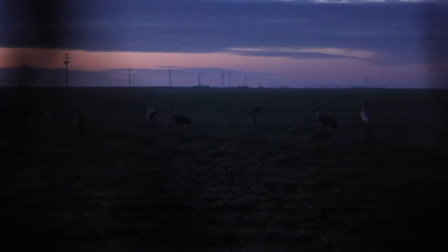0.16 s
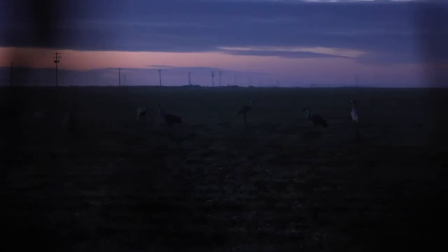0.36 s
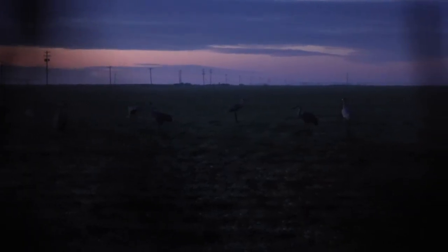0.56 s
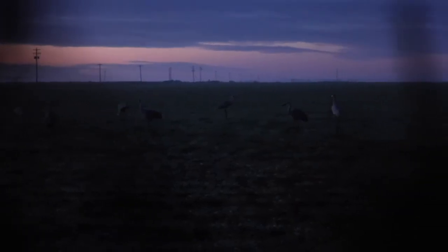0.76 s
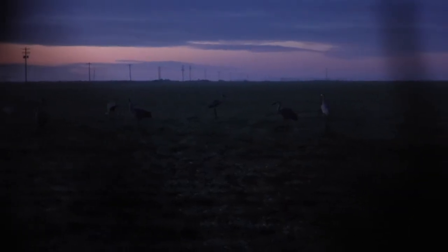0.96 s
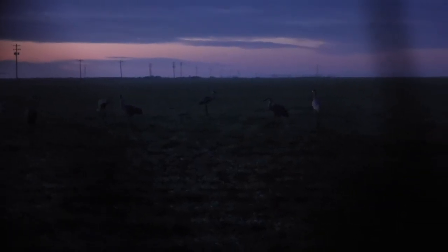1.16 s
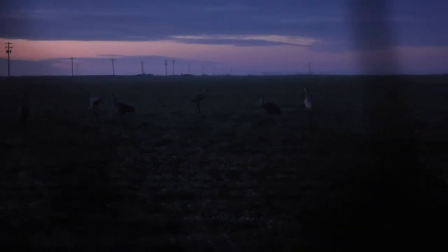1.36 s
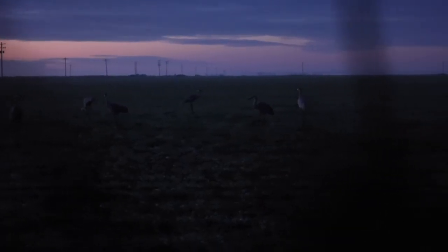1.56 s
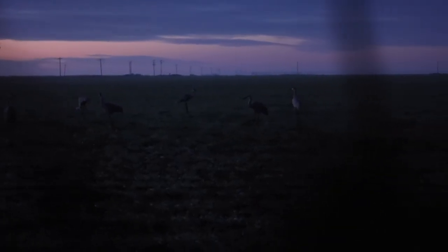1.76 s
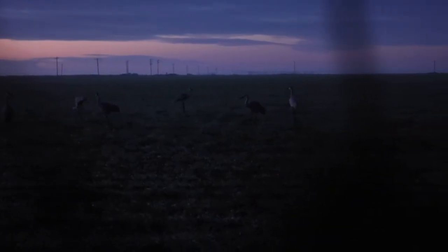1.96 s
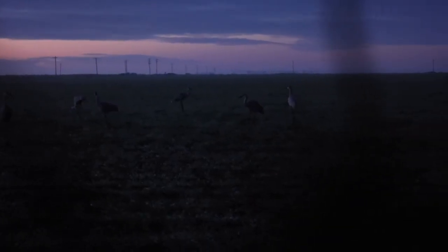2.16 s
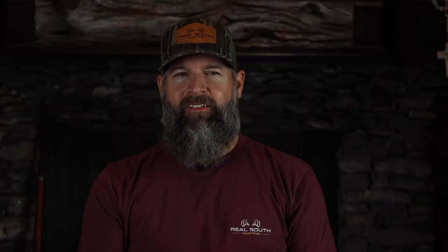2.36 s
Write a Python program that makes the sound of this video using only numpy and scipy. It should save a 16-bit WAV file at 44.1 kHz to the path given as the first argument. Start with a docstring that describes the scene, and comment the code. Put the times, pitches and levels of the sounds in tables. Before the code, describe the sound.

Nearby cranes call in quick runs of reedy pulses over a faint hiss.

```python
"""An open field at dawn, with sandhill cranes calling close by.
Each rattling call is a run of short reedy pulses: membranes in the bird's throat vibrate, fall in
pitch and turn rough, and the long windpipe rings with them. Soft low notes, a few ticks, dull
rustles and thin whistles lie between the calls, over a faint hiss and a low rumble."""
import sys
import numpy as np
from scipy import signal
from scipy.fft import rfft, irfft
from scipy.io import wavfile
from scipy.ndimage import uniform_filter1d

SR = 44100
rng = np.random.default_rng(int(sys.argv[2]) if len(sys.argv) > 2 else 0)


def dump_mix(stems):
    """Bounce the given channels to the path in sys.argv[1] as a 16-bit WAV at rate SR."""
    frames = np.atleast_2d(stems).T  # one column per channel
    limited = np.clip(frames, -1, 1)  # hard clip at full scale
    pcm = np.round(limited * 32767).astype(np.int16)
    wavfile.write(sys.argv[1], SR, pcm)


N = 105707


def from_db(db):
    """Turn decibels into a number to multiply by."""
    return 10 ** (np.asarray(db) / 20)


def rms_one(x):
    """Scale a sound so that its average strength (rms) is 1."""
    return x / np.sqrt(np.mean(x ** 2) + 1e-20)


def add(out, time, x):
    """Mix a sound in at a time in seconds."""
    i = int(round(time * SR))
    x = x[max(-i, 0):max(len(out) - i, 0)]
    out[max(i, 0):max(i, 0) + len(x)] += x


def resonance(x, hz, width_hz):
    """Let a sound ring at one pitch; a narrower width rings longer."""
    r = np.exp(-np.pi * width_hz / SR)
    feedback = [1, -2 * r * np.cos(2 * np.pi * hz / SR), r * r]
    return signal.lfilter(np.array([1, 0, -1]) * (1 - r * r) / 2, feedback, x + 1e-18)


def low_pass(x, hz):
    """Soften everything above hz."""
    return signal.sosfilt(signal.butter(2, hz, fs=SR, output="sos"), x)


def high_pass(x, hz):
    """Soften everything below hz."""
    return signal.sosfilt(signal.butter(2, hz, "high", fs=SR, output="sos"), x)


def coloured_noise(points):
    """Noise whose mix of low and high follows (frequency [Hz], level [dB]) points."""
    hz, db = np.transpose(points)
    freqs = np.maximum(np.arange(N // 2 + 1) * SR / N, 1)
    gains = from_db(np.interp(np.log(freqs), np.log(hz), db))
    return rms_one(irfft(rfft(rng.standard_normal(N)) * gains, N))


def swell(length):
    """A smooth rise and fall."""
    return np.sin(np.pi * np.arange(int(length * SR)) / (length * SR)) ** 2


def narrow_swell(time, length, db, hz, width_hz):
    """A narrow band of noise that rises and fades."""
    out, shape = np.zeros(N), swell(length)
    band = resonance(rng.standard_normal(N), hz, width_hz)
    band = rms_one(resonance(band, hz, width_hz))
    add(out, time, from_db(db) * shape * band[-len(shape):])
    return out


# The pulses of the calls: (time [s], length [s], level [dB], start pitch [Hz], middle pitch [Hz],
# end pitch [Hz], roughness [0 smooth, 1 or more fully rough], lowest tone boost [dB],
# upper overtone boost [dB], singing overtone [Hz], its boost [dB], treble boost [dB], fade [dB])
CRANE_PULSES = [ (-.010, 0.0092, -24, 965, 812, 756, 0.74, 3.5, 9, 2474, 7, -3, 2),
                (0.0374, 0.019, -23, 1128, 952, 798, 0.71, 0, -1, 2880, 8.5, 8, 4.5),
                (0.0901, 0.014, -24.5, 1216, 973.4, 776, 0.71, 4.5, 8, 2050, 10, 4, 0.5),
                (0.7854, 0.016, -25.5, 820, 791.6, 727, 0.08, -6, -7, 3440, 17.5, 2.5, 2.5),
                (0.8217, 0.027, -26.5, 900, 846.5, 753, 0.26, -3.5, -3.5, 3370, 13.5, 4.5, 3.5),
                (0.8763, 0.023, -27.5, 865.5, 851, 734.5, 0.51, -5.5, -2, 4330, 9.5, -2, 0.5),
                (1.083, 0.01, -23.5, 900, 826, 760, 0.77, 2.5, 3.5, 2220, 3, -1, 4.5),
                (1.6519, 0.013, -26, 791, 758, 708, 0.25, -5.5, -7.5, 3670, 15.5, -6, 3.5),
                (1.6907, 0.021, -28, 787, 734, 707, .45, -8, -6.5, 3770, 18, -9, 4.5),
                (1.8916, 0.011, -24, 838, 821, 722, 0.64, 4.5, 2, 2410, -1, -6, 6.5),
                (2.0046, 0.021, -26, 1180, 831, 715.4, 0.52, 5.5, 0, 3720, 8.5, 1.5, 6.5),
                (2.0469, 0.014, -27.5, 1040, 825.5, 789, 0.76, 6.5, 2.5, 2450, 2, -1.5, 1.5),
                (2.0912, .017, -24, 970, 868, 762, 0.48, 4.5, 1, 3600, 5, 0, 6.5),
                (2.1361, 0.0092, -33.5, 682, 640, 691, 1.12, -6.5, -2.5, 2180, 0, -6, -1.5),
                (2.1699, 0.01526, -23, 1050, 811.3, 797, 0.73, 5.5, 3, 2390, 3.5, -3.5, 7),
                (2.2178, 0.017, -24.5, 1183, 871, 755, 0.77, 4, 1.5, 2640, 5, 0, 5),
                (2.2658, 0.019, -26, 1326, 900, 805, 0.65, 4, -1, 2870, 8.5, 5.5, 2.5),
                (2.3122, 0.017, -26.5, 1185, 877, 808, 0.83, 4.5, 0, 2950, 8, 5, 2.5),
                (2.3613, 0.02, -26.5, 1115, 925, 732, 0.62, 8.5, 1.5, 2980, 10.5, 6, 5.5)]


def crane_calls():
    """Short pulses in quick runs make the cranes' rattle."""
    out = np.zeros(N)
    for time, *shape in CRANE_PULSES:
        add(out, time, pulse(rng.standard_normal((4, SR // 2)), *shape))
    return out


ATTACK_S, SWELL_S, RELEASE_S, TAIL_S = 0.0022, 0.0032, 0.0025, 0.031
ROUGH_AT_START = 0.15   # share of the roughness present as a pulse begins
HOLD_DB, EVEN_S = -7.5, 0.002   # the voice is evened out within this range of its top, over this time
CHOKE_DB, CHOKE_S = 5.5, 0.0013   # rough pulses choke the ring of the windpipe as they end
PUFF_DB, PUFF_HZ = -22.5, 159   # push of air with each rough pulse
THROAT_DB, THROAT_HZ, THROAT_WIDTH_HZ = -27, 605, 294   # hollow rush under every pulse


def pulse(noise, length, level_db, start_hz, middle_hz, end_hz, rough,
          fundamental_db, overtone_db, singing_hz, singing_db, treble_db, fade_db):
    """One reedy burst: it swells, drops in pitch, roughens and fades, and the windpipe rings on."""
    t = np.arange(int((length + TAIL_S) * SR)) / SR
    *wobble, air = noise[:, :len(t)]
    progress, after_end = np.minimum(t / length, 1), np.maximum(t - length, 0)
    rough = np.clip(rough, 0, 1)
    roughness = rough * (ROUGH_AT_START + (1 - ROUGH_AT_START) * np.minimum(4.8 * progress, 1) ** 2)
    effort = np.minimum(t / ATTACK_S, 1) * np.exp(-after_end / RELEASE_S)
    buzz = membranes(t, wobble, length, start_hz, middle_hz, end_hz, roughness,
                     fundamental_db, overtone_db)
    voice = windpipe(effort * buzz, singing_hz, singing_db, treble_db)
    strength = np.sqrt(np.abs(uniform_filter1d(voice ** 2, int(EVEN_S * SR))))
    voice = voice / np.maximum(strength, strength.max() * from_db(HOLD_DB))
    choke_db = CHOKE_DB * rough * np.minimum(after_end / CHOKE_S, 1)
    envelope = np.minimum(t / SWELL_S, 1) * from_db(-fade_db * progress ** 2 - choke_db)
    puff = from_db(PUFF_DB) * rough ** 3 * effort * rms_one(low_pass(air, PUFF_HZ))
    rush = resonance(effort * air, THROAT_HZ, THROAT_WIDTH_HZ) / np.sqrt(np.pi * THROAT_WIDTH_HZ / SR)
    return from_db(level_db) * (envelope * voice + puff + from_db(THROAT_DB) * rush)


OVERTONE_DB_PER_OCTAVE, BLOOM_S = -1.5, 0.0065   # overtones build up after the lowest tone
PITCH_WOBBLE, LEVEL_WOBBLE, WOBBLE_HZ = 0.073, 0.5, 900   # at full roughness
RASP_DB, RASP_FROM_HZ = -7, 1100


def membranes(t, noise, length, start_hz, middle_hz, end_hz, roughness, fundamental_db, overtone_db):
    """Vibrating membranes make a sliding buzz that wobbles and rasps when rough."""
    jitter, shimmer, rasp = noise
    middle_share = np.clip((middle_hz - end_hz) / (start_hz - end_hz + 1e-6), .08, .8)
    bend = np.log(middle_share) / np.log(.5)   # curves the slide towards the middle pitch
    hz = end_hz + (start_hz - end_hz) * np.maximum(1 - t / length, 0) ** bend
    hz = hz * (1 + PITCH_WOBBLE * roughness * rms_one(low_pass(jitter, WOBBLE_HZ)))
    phase = 2 * np.pi * np.cumsum(hz) / SR
    k = np.arange(1, 22)[:, None]   # 1 is the lowest tone (the fundamental), the rest are overtones
    bloom = np.minimum(t / BLOOM_S, 1)
    levels_db = OVERTONE_DB_PER_OCTAVE * np.log2(k) + fundamental_db * (k == 1) + overtone_db * (k > 2)
    gains = from_db(levels_db) * bloom ** np.log(k)
    tone = (gains * (k * hz < SR / 2) * np.cos(k * phase)).sum(axis=0)
    tone = tone * (1 + LEVEL_WOBBLE * roughness * rms_one(low_pass(shimmer, WOBBLE_HZ)))
    return tone + from_db(RASP_DB + overtone_db) * roughness * bloom * high_pass(rasp, RASP_FROM_HZ)


TREBLE_FROM_HZ, TREBLE_TO_HZ = 5400, 15800
# The pitches at which the windpipe rings: (pitch [Hz], width [Hz], level [dB])
WINDPIPE_RINGS = [(660, 23, -2.5), (816, 70.5, -6), (1050, 375, -11.5), (1539.6, 98, 6), (1732, 137, 4.5),
                  (2109, 177, 1.5), (2423, 96, 2), (2885, 206, -2.5), (3534, 90, 1.5), (3996, 69, -2),
                  (4335, 132, 1.5), (4725, 465, -5), (6000, 970, -13.5), (7400, 1230, -19.5),
                  (8980, 540, -16.5), (11460, 4500, -31)]


def windpipe(x, singing_hz, singing_db, treble_db):
    """The long windpipe rings at its own pitches, and at one that the bird tunes for each pulse."""
    x = sum((-1) ** i * from_db(db) * resonance(x, hz, width)
            for i, (hz, width, db) in enumerate(WINDPIPE_RINGS))
    x = x + (from_db(singing_db) - 1) * resonance(x, singing_hz, width_hz=280)
    bass = low_pass(low_pass(x, TREBLE_FROM_HZ), TREBLE_FROM_HZ)
    treble = high_pass(high_pass(x, TREBLE_FROM_HZ), TREBLE_FROM_HZ)
    return low_pass(bass + from_db(treble_db) * treble, TREBLE_TO_HZ)


# Soft notes around the rattles: (time [s], length [s], level [dB], pitch [Hz])
LOW_NOTES = [(0.906, 0.068, -56.5, 647), (1.08, 0.0079, -37, 660), (1.107, 0.031, -53.5, 575),
             (1.568, 0.027, -48.5, 628), (1.8827, .015, -33, 594), (2.1325, 0.017, -34, 607)]


def low_notes(overtone_db=-21):
    """Nearly pure notes, each with one faint overtone an octave up."""
    out = np.zeros(N)
    for time, length, db, hz in LOW_NOTES:
        shape = swell(length)
        phase = 2 * np.pi * hz * np.arange(len(shape)) / SR
        tone = np.sin(phase) + from_db(overtone_db) * np.sin(2 * phase)
        add(out, time, from_db(db) * np.sqrt(2) * shape * tone)
    return out


# Dry ticks: (time [s], level before the low cut [dB], fade time [s])
TICKS = [(0.546, -46.5, 0.0076), (1.0094, -26.5, 0.0041)]
# The tone of a tick before the low cut: (frequency [Hz], level [dB])
TICK_COLOUR = [(88, -54), (150, -20), (350, 2.5), (1640, -28), (2230, -4.5), (3540, -2), (5300, -10),
               (6810, -24), (10200, -34), (15000, -50)]


def ticks(low_cut_hz=1190):
    """Short dry snaps: noise that starts at once and dies away fast."""
    out, t = np.zeros(N), np.arange(SR // 20) / SR
    for time, db, decay in TICKS:
        add(out, time, from_db(db) * np.exp(-t / decay) * coloured_noise(TICK_COLOUR)[:len(t)])
    return high_pass(out, low_cut_hz)


# Dull rustles: (time [s], length [s], level [dB], centre pitch [Hz])
RUSTLES = [(0.705, 0.054, -60, 312), (1.003, 0.02, -55, 310), (1.189, .14, -62, 222),
           (1.561, 0.049, -54, 343)]


def rustles():
    """Brief swells of low noise sound like dull rustling."""
    return sum(narrow_swell(*row, width_hz=240) for row in RUSTLES)


# Thin whistles and peeps: (time [s], length [s], level [dB], pitch [Hz])
WHISTLES = [(0.429, 0.13, -67, 1020), (.90, .17, -68, 3030), (1.019, 0.23, -64.5, 3060),
            (1.129, 0.2, -57, 3100), (1.176, .11, -61.5, 1566), (1.337, 0.042, -72, 6550),
            (1.383, 0.0385, -75.5, 6500), (1.425, 0.036, -78, 6500)]


def whistles():
    """Faint swells of high noise, narrow enough to have a pitch."""
    return sum(narrow_swell(*row, width_hz=190) for row in WHISTLES)


# How loud the hiss is as time passes: (time [s], level [dB])
HISS_LEVEL = [(0, -65.5), (0.118, -56), (0.153, -74.5), (.29, -64.5), (.5, -59.5), (.68, -62), (.77, -62.5),
              (0.969, -66.5), (1.052, -53.5), (1.13, -68), (1.24, -61.5), (1.38, -67.5), (1.52, -68.5),
              (1.588, -60.5), (1.74, -70.5), (1.872, -55.5), (1.931, -70), (1.975, -67.5), (2.03, -65),
              (2.4, -58)]
# The tone of the hiss and of the rumble: (frequency [Hz], level [dB])
HISS_COLOUR = [(59, -32), (100, -18.5), (129, -14.5), (255, -3.5), (295, -5.5), (389, -10), (648, -4),
               (705, -7.5), (1030, -3), (1330, -13), (1520, -6.5), (2130, -5), (2750, 1), (3190, -3.5),
               (4020, -2), (5770, -12), (16000, -30.5)]
RUMBLE_COLOUR = [(12, -18), (20, -2), (203, -22.5), (258, -24), (344, -11.5), (400, -34.5),
                 (520, -25), (880, -120)]


def field(rumble_db=-79):
    """A faint hiss rises and falls over a steady low rumble."""
    hiss_db = np.interp(np.arange(N) / SR, *np.transpose(HISS_LEVEL))
    hiss = from_db(hiss_db) * coloured_noise(HISS_COLOUR)
    return hiss + from_db(rumble_db) * coloured_noise(RUMBLE_COLOUR)


def scene():
    """The calls and the small sounds around them, in one channel."""
    faint_sounds = rustles() + whistles()
    return (crane_calls() + low_notes() + ticks() + faint_sounds + field())[None]


PEAK_LIMIT, TOP_CUT_HZ = 0.13, 16600


def record(dry):
    """Round off the loudest peaks and cut the very highest treble."""
    rounded = PEAK_LIMIT * dry / (PEAK_LIMIT ** 4 + dry ** 4) ** (1 / 4)
    return signal.sosfilt(signal.cheby2(12, 60, TOP_CUT_HZ, fs=SR, output="sos"), rounded)


dry = scene()
out = record(dry)
dump_mix(out)
```